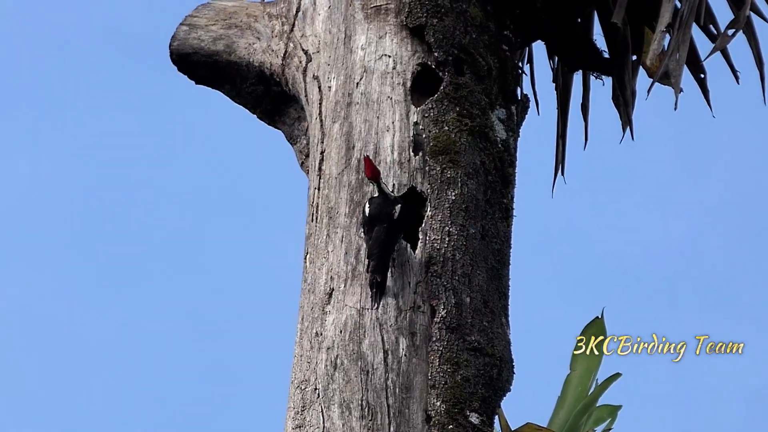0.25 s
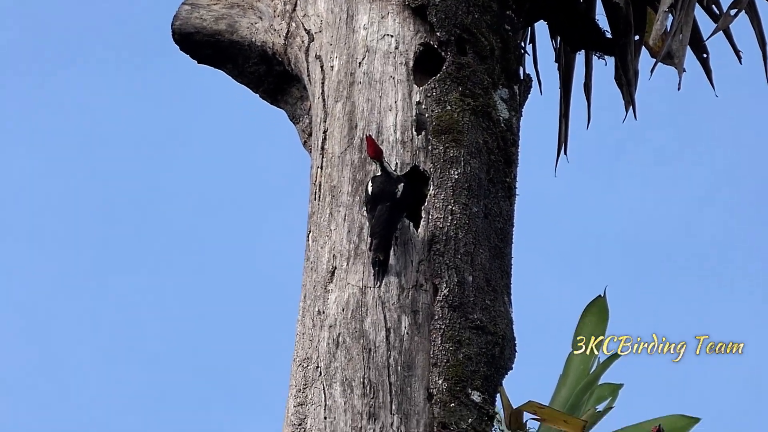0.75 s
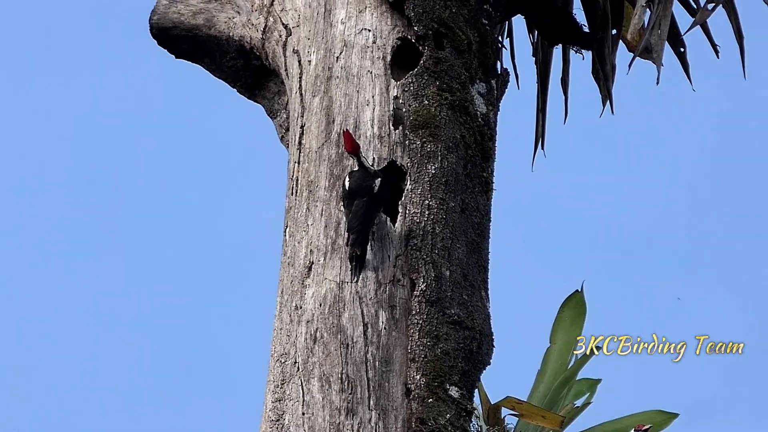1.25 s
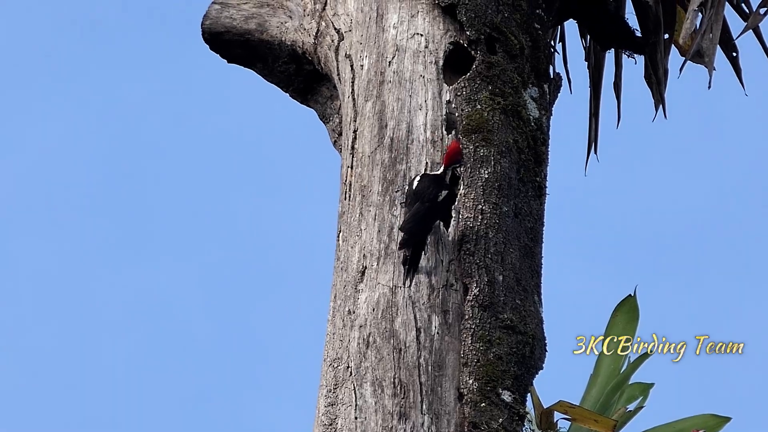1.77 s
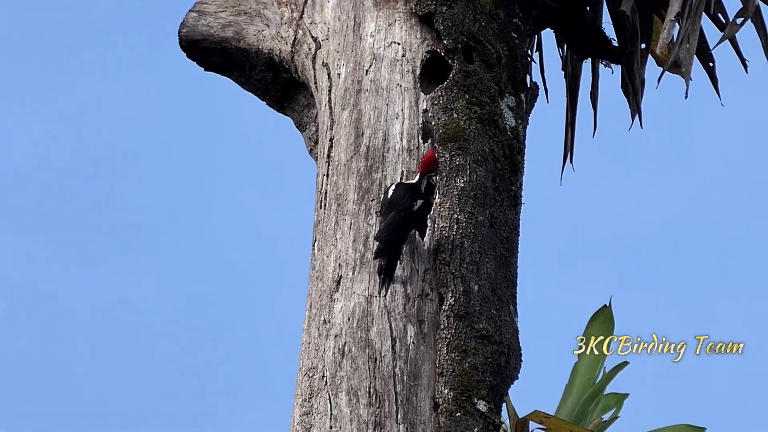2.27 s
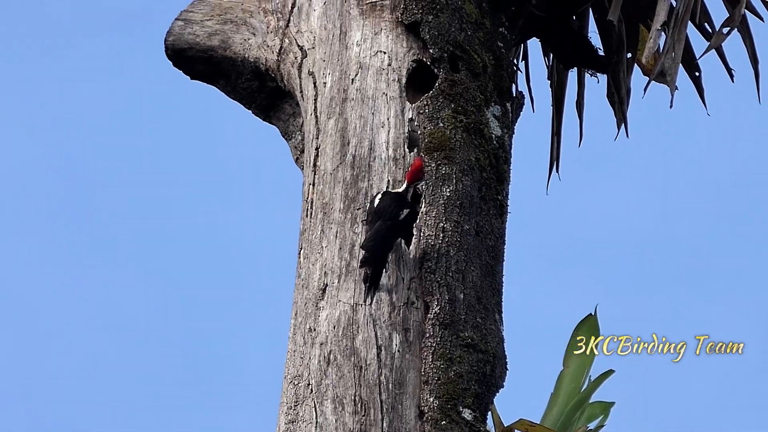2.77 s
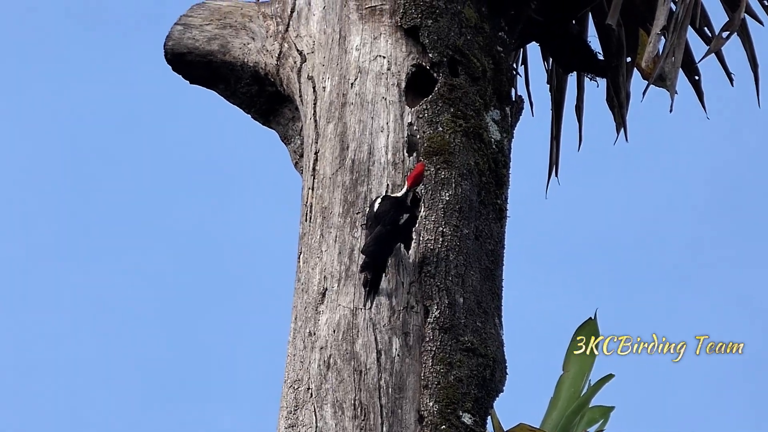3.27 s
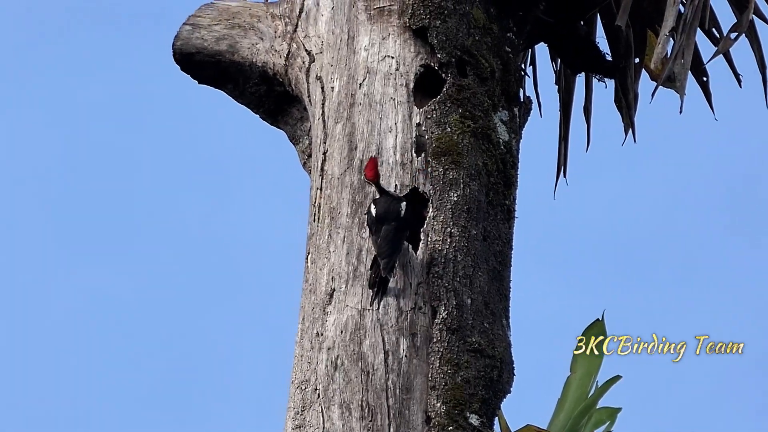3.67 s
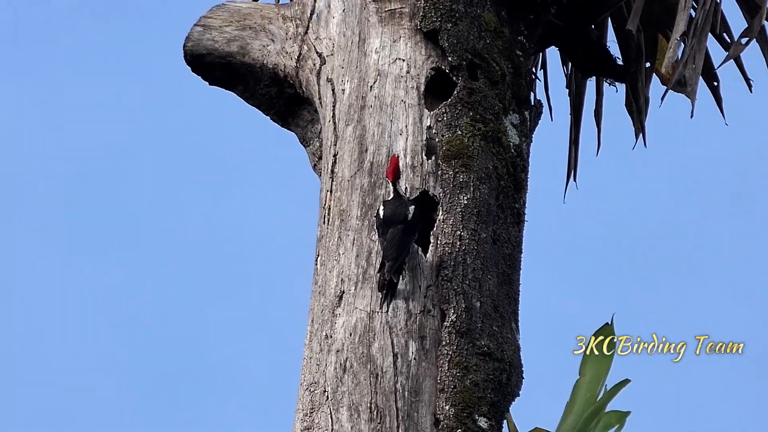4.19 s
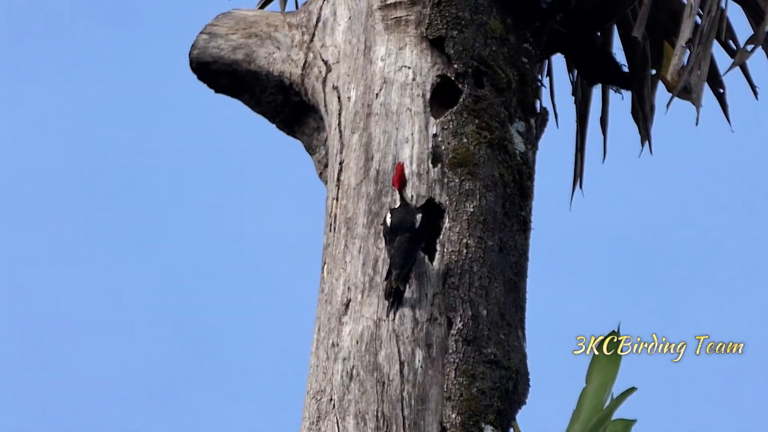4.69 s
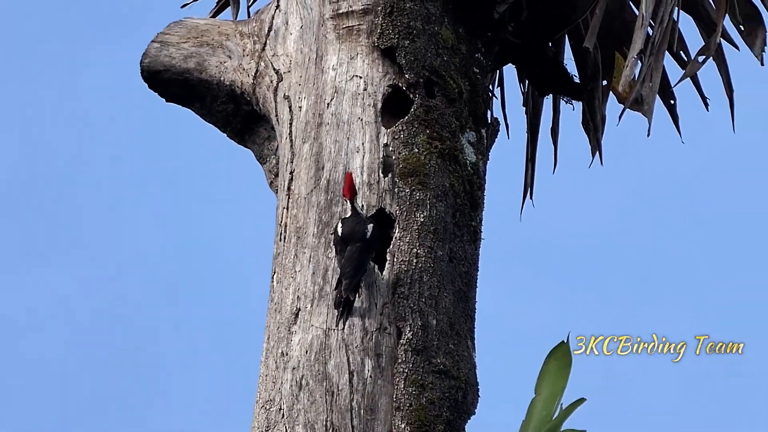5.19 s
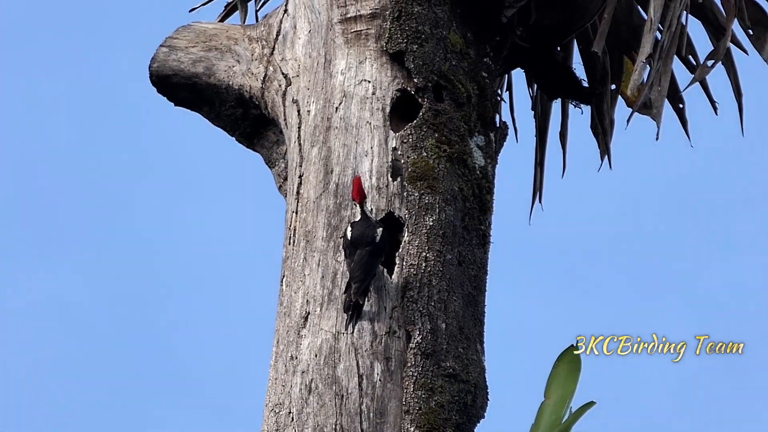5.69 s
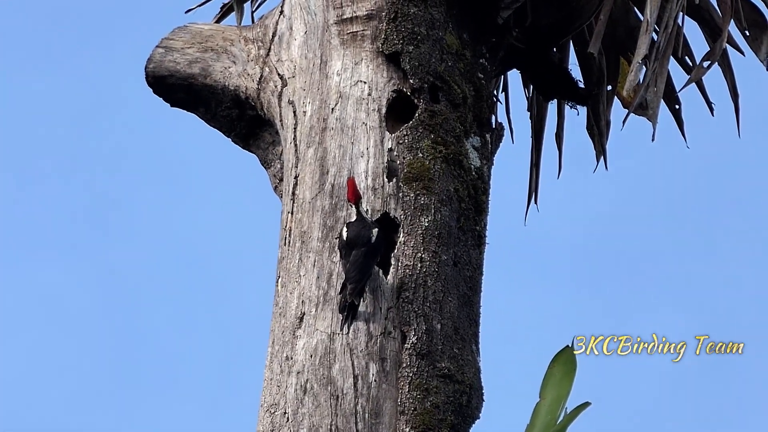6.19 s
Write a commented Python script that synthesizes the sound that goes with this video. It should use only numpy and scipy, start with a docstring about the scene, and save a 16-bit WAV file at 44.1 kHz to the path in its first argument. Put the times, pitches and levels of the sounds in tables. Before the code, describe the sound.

A quiet forest edge with faint hiss, heard in stereo; a woodpecker calls slightly right of centre, its voice scattering off trees. At 0 s comes a very short raspy churr. From about 0.7 to 1.5 s it gives four rapid harsh calls, each a thin high whistle snapping into a held nasal note, then a louder, rough falling yelp; some linger nasally. A soft claw scuff sounds near 1.75 s. Single calls follow at 2.3 and 2.7 s. Between 3.5 and 4.4 s there are five short rattles, buzzy rasps tipping into fluttering churrs, the last very faint. Two close yelping calls come at 4.7-5.0 s and two more at 5.1-5.45 s. Echoes fade while a distant rush, swelling since 3.5 s, peaks around 5.7 s. Dry bark ticks at 5.9 and 6.3 s frame thin, faint bird whistles; a low far drone rises at the end.

```python
"""Forest edge, a woodpecker on a dead trunk a little right of the microphone, giving bursts of harsh calls.
Each call is a thin sine whistle, a held nasal note of syrinx harmonics, then a loud falling yelp.
Between them it rattles: pulses ringing the throat (a rasp) tip over into a fluttering churr.
The trees return echoes and scatter; behind is shaped noise for forest hiss, a swelling far rush and drone,
hums and puffs of air. A small far bird whistles, claws scuff, and the bark ticks twice."""
import sys
import numpy as np
from scipy import signal
from scipy.fft import rfft, irfft
from scipy.io import wavfile

SR = 44100
rng = np.random.default_rng(int(sys.argv[2]) if len(sys.argv) > 2 else 0)


def master(y):
    """Save y as 16-bit WAV."""
    cut = np.clip(np.atleast_2d(y).T, -1, 1)
    pcm = np.round(cut * 32767)  # scale
    wavfile.write(sys.argv[1], SR, pcm.astype(np.int16))


N = 284445
TIME = np.arange(N) / SR


def from_db(db):
    """Decibels to amplitude gain."""
    return 10 ** (np.asarray(db) / 20)


def rms_one(x):
    """Scale to unit power."""
    return x / np.sqrt(np.mean(x ** 2) + 1e-20)


def at_hz(points, hz):
    """Read a table on a log-frequency axis."""
    table_hz, value = np.transpose(points)
    return np.interp(np.log(np.maximum(hz, 1)), np.log(table_hz), value)


def level(rows):
    """Gain over time from rows of start_s, level_db."""
    return from_db(np.interp(TIME, *np.transpose(rows)))


def band(x, low_hz, high_hz, order=2):
    """Butterworth band-pass."""
    edges = [low_hz, min(high_hz, .49 * SR)]
    return signal.sosfilt(signal.butter(order, edges, "band", fs=SR, output="sos"), x)


def resonate(x, modes):
    """Parallel two-pole resonances with alternating signs; a wider one rings for less time."""
    out = 0
    for k, (hz, width, db) in enumerate(modes):
        r = np.exp(-np.pi * width / SR)
        zeros = [(1 - r * r) / 2, 0, (r * r - 1) / 2]
        poles = [1, -2 * r * np.cos(2 * np.pi * hz / SR), r * r]
        out = out + (-1) ** k * from_db(db) * signal.lfilter(zeros, poles, x)
    return out


def wobble(t, rate_hz):
    """Random wander about zero: normal draws at the given rate, joined by straight lines."""
    return np.interp(t * rate_hz, np.arange(2048), rng.standard_normal(2048))


def clock(length):
    """Time since the start of a note."""
    return np.arange(int(length * SR)) / SR


def swell(t, attack, release):
    """Rounded rise and fall of a note."""
    rise = np.sin(np.pi / 2 * np.clip(t / attack, 0, 1))
    fall = np.sin(np.pi / 2 * np.clip((t[-1] - t) / release, 0, 1))
    return rise * fall


def sine(pitch):
    """Unit-power tone following a pitch in Hz."""
    return np.sqrt(2) * np.sin(2 * np.pi * np.cumsum(pitch) / SR)


def add(out, s, sound):
    """Mix a sound in at a time."""
    at = max(round(s * SR), 0)
    out[at:at + len(sound)] += sound[:N - at]


def pan(db):
    """Channel gains for a left-minus-right level."""
    return from_db(np.array([[1], [-1]]) * db / 2)


def stereo(mid, side, alike):
    """Left and right spectra from two independent ones, with a given correlation."""
    return np.sqrt(1 + alike) * mid + np.sqrt(1 - alike) * side * [[1], [-1]]


# how alike the background is at left and right: pitch_hz, correlation [-1 to 1]
BACKGROUND_LIKENESS = [(60, .1), (250, 0.15), (700, 0.2), (2000, 0.22), (5000, 0.76), (13000, 0.22)]
# which side the background leans to: pitch_hz, left_minus_right_db
BACKGROUND_BALANCE = [(60, 16), (150, 6), (600, 7), (1200, 0), (3000, -1), (12000, 1)]


def noise(spectrum):
    """Steady stereo noise of a given colour, unit power in the mean of the channels."""
    hz = np.fft.rfftfreq(N, 1 / SR)
    alike = np.clip(at_hz(BACKGROUND_LIKENESS, hz), -1, 1)
    mid, side = rfft(rng.standard_normal((2, N)))
    both = stereo(mid, side, alike) * pan(at_hz(BACKGROUND_BALANCE, hz))
    out = irfft(both * from_db(at_hz(spectrum, hz)), N)
    return out / out.mean(axis=0).std()


# colour of the still forest: pitch_hz, level_db [per Hz]
FOREST_COLOUR = [(100, -40), (200, -29.5), (330, -17.5), (480, -19), (700, -10.5), (1100, -5), (1600, 6.5),
                 (2100, 0), (2800, -1), (4000, -2), (4800, -13), (6200, -3), (8200, -17), (10000, -12),
                 (15000, -23)]
FOREST_DB = -55
# colour of the far rush: pitch_hz, level_db [per Hz]
RUSH_COLOUR = [(120, -29), (290, -39), (390, -28), (500, -18), (750, -0.5), (1100, 3), (1600, 2.5),
               (2300, -7), (4000, -8), (6000, -19), (10000, -26)]
# swelling of the far rush: start_s, level_db
RUSH_SWELL = [(0, -64), (3.3, -65), (3.8, -58), (4.6, -56), (5.2, -52.5), (5.7, -52), (6.1, -53),
              (6.45, -56)]


def forest_and_rush():
    """Forest hiss and a far rush; moving air fades the far sound in and out, band by band."""
    steady = from_db(FOREST_DB) * noise(FOREST_COLOUR) + level(RUSH_SWELL) * noise(RUSH_COLOUR)
    fading = 0
    for hz in (504, 670, 910, 1250):
        fading = fading + band(steady, hz / 1.18, hz * 1.18, order=1) * .27 * wobble(TIME, 11)
    return steady + fading


# swelling of the far low drone: start_s, level_db
DRONE_SWELL = [(0, -105), (5.4, -100), (5.9, -80), (6.15, -77), (6.3, -64.5), (6.45, -57.5)]


def far_drone():
    """A far low drone: noise with humps near 140 and 290 Hz."""
    # pitch_hz, level_db [per Hz]
    colour = [(30, -32), (90, 1), (140, 13.0), (200, -1), (290, 10.5), (450, -10), (900, -43)]
    return level(DRONE_SWELL) * noise(colour)


# faint far hums: centre_s, pitch_hz, level_db
FAR_HUMS = [(.9, 343, -77), (2.13, 668, -73.5), (2.98, 330.7, -76.5), (3.64, 685, -68.5), (4.236, 605, -67),
            (4.62, 254, -75.5)]
HUM_HALF_S = .16   # half the length of a hum


def far_hums(white):
    """Narrow bands of noise, each under a flat-topped swell."""
    out = 0
    for s, hz, db in FAR_HUMS:
        shape = np.exp(-((TIME - s) / HUM_HALF_S) ** 4)
        out = out + from_db(db) * shape * rms_one(band(white, hz - 25, hz + 25))
    return out


# puffs of air on the microphone: centre_s, half_width_s, level_db
AIR_PUFFS = [(0.242, 0.064, -65), (.71, 0.078, -80), (1.22, 0.1, -83), (2.44, 0.04, -72),
             (2.58, 0.081, -77), (2.92, 0.052, -77), (4.86, 0.021, -75)]
AIR_FLOOR_DB, AIR_SWING_DB = -107, 7   # faint stirring of the air, also between the puffs


def air_on_microphone(white):
    """Low noise in light puffs over a faint random stirring, stronger on the right."""
    gusts = sum(from_db(db) * np.exp(-((TIME - s) / width) ** 4) for s, width, db in AIR_PUFFS)
    stirring = from_db(AIR_FLOOR_DB + AIR_SWING_DB * wobble(TIME, 12))
    return (gusts + stirring) * rms_one(band(white, 25, 130)) * pan(-6)


def background():
    """Everything behind the birds; hums and puffs are filtered from the same noise."""
    white = rng.standard_normal((2, N))
    return forest_and_rush() + far_drone() + far_hums(white[0]) + air_on_microphone(white)


# small far bird, thin arched whistles: start_s, length_s, pitch_hz [before arch and wander], level_db
SMALL_BIRD_WHISTLES = [(5.98, .175, 5790, -62), (6.22, .19, 5900, -62), (6.05, .12, 6850, -72),
                       (6.25, .15, 7150, -70)]


def small_bird(arch=0.0186):
    """Thin sine whistles that swell softly and arch a little in pitch."""
    out = np.zeros(N)
    for s, length, hz, db in SMALL_BIRD_WHISTLES:
        t = clock(length)
        pitch = hz * (1 + arch * (np.sin(2.3 * t / length) - .8) + 0.006 * wobble(t, 192))
        add(out, s, from_db(db) * swell(t, 0.018, 0.01) * sine(pitch))
    return out


# dry ticks on the bark: start_s, peak_db
BARK_TICKS = [(5.891, -32), (6.336, -36)]
# resonances of the bark under a tick: pitch_hz, width_hz, level_db
BARK_MODES = [(818, 110, 2), (2140, 350, -2), (3100, 500, -8.5)]
SCUFF_S, SCUFF_WIDTH_S, SCUFF_DB = 1.748, .022, -54   # claws shift on the bark


def bark():
    """A scuff of claws as a hump of noise, and short bursts of noise that ring the bark as ticks."""
    scrape = rms_one(signal.lfilter([1], [1, -.7], band(rng.standard_normal(N), 1900, 11000)))
    out = from_db(SCUFF_DB) * np.exp(-((TIME - SCUFF_S) / SCUFF_WIDTH_S) ** 2 / 2) * scrape
    t = clock(.03)
    for s, db in BARK_TICKS:
        crunch = rng.standard_normal(len(t)) * np.exp(-((t - .003) / 0.0032) ** 2)
        tick = band(resonate(crunch, BARK_MODES), 800, 5000)
        add(out, s, from_db(db) * tick / np.abs(tick).max())
    return out


# decay of the forest tail: pitch_hz, t60_s
FOREST_DECAY = [(900, 0.84), (1500, 0.56), (2200, 0.93), (4000, 1), (7000, 0.98), (14000, 0.16)]


def scatter(near_db=-4, near_t60=0.45, far_db=-7, build_up=0.028, alike=0.75):
    """Stereo response of the trees: quick scatter from near branches and a long tail from the forest."""
    t, edges = clock(1), [500, 1200, 1800, 3000, 5000, 9000, 16000]
    mid, side = rfft(rng.standard_normal((2, len(t))))
    hz = np.fft.rfftfreq(len(t), 1 / SR)
    both = stereo(mid, side, alike)
    onset = 1 - np.exp(-t / build_up)
    response = 0
    for low, high in zip(edges, edges[1:]):
        far_t60 = at_hz(FOREST_DECAY, np.sqrt(low * high))
        near = from_db(near_db) * rms_one(onset * from_db(-60 * t / near_t60))
        far = from_db(far_db) * rms_one(onset * from_db(-60 * t / far_t60))
        in_band = (hz >= low) & (hz < high)
        response = response + irfft(both * in_band, len(t)) * np.hypot(near, far)
    return response / np.sqrt(2 * len(t))


# echoes off trunk, ground and near trees: delay_s, level_db, left_minus_right_db
TREE_ECHOES = [(.0093, -12.5, 18.5), (0.019, -15.5, -17.5), (0.033, -9.5, -3.5), (.052, -11.5, 12)]


def trees(x):
    """Distinct echoes plus scatter, drawn afresh every third of a second and crossfaded,
    so no one random pattern of reflections lasts."""
    out = x
    for delay, db, side_db in TREE_ECHOES:
        out = out + from_db(db) * pan(side_db) * np.interp(TIME - delay, TIME, x, left=0)
    hop = SR // 3
    for centre in range(0, N + hop, hop):
        at = np.arange(max(centre - hop, 0), min(centre + hop, N))
        piece = x[at] * np.cos(np.pi / 2 * (at - centre) / hop)   # crossfades with its neighbours
        for channel, wet in zip(out, signal.fftconvolve(piece[None], scatter(), axes=1)):
            add(channel, at[0] / SR, wet)
    return out


# response of the woodpecker's throat: pitch_hz, level_db
THROAT_RESPONSE = [(1400, -7), (2000, -2), (3000, 3), (4200, -0.5), (5300, -8.5), (6200, -4.5), (7200, -17),
                   (8200, -13.5), (10200, -27.5), (12200, -35), (14200, -26.5), (16000, -65)]


def syrinx(t, hz, second_db, upper_db, jitter, shimmer, slope_db, hiss_db):
    """Harmonics of an unsteady membrane, with air noise released each cycle, shaped by the throat."""
    phase = 2 * np.pi * np.cumsum(hz * (1 + jitter * wobble(t, 872.6))) / SR
    tone = 0
    for k in range(1, 10):
        if k == 1:
            db = 0
        elif k == 2:
            db = second_db
        else:
            db = upper_db + slope_db * np.log2(k / 3)
        audible = k * hz < SR / 2
        tone = tone + from_db(db + at_hz(THROAT_RESPONSE, k * hz)) * audible * np.sin(k * phase)
    breath = rng.standard_normal(len(t)) * (1 + np.cos(phase))
    throat = from_db(at_hz(THROAT_RESPONSE, np.fft.rfftfreq(len(t), 1 / SR)))
    air = rms_one(band(irfft(rfft(breath) * throat, len(t)), 2150, 23000, order=3))
    return np.sqrt(2) * tone * (1 + shimmer * wobble(t, 700)) + from_db(hiss_db + upper_db) * air


# throat resonances rung by a rasp: pitch_hz, width_hz, level_db
RASP_RESONANCES = [(1690, 373, 10), (2410, 380, 7), (3700, 2300, 2.5), (4940, 1520, -2), (7600, 830, -42)]
RASP_RISE, RASP_RELEASE_S = .06, 0.046   # rise of the pulse rate as a share of it


def rasp(length, rate, db, hiss=0.064, attack_share=0.28):
    """Slow pulses of the syrinx, by turns strong and weak, ring the throat."""
    t = clock(length)
    unsteady = 1 + .014 * wobble(t, 500)
    cycles = np.cumsum(rate * (1 + RASP_RISE * (t / length - .5)) * unsteady) / SR
    strength = from_db(2 * np.cos(np.pi * cycles) + 2.2 * wobble(t, 600))
    pulses = np.diff(np.floor(cycles), prepend=0) * strength   # one for each whole cycle passed
    buzz = band(resonate(pulses + hiss * wobble(t, SR / 4), RASP_RESONANCES), 1440, 8000)
    return from_db(db) * swell(t, attack_share * length, RASP_RELEASE_S) * rms_one(buzz)


CHURR_RISE = 0.0377   # rise in pitch as a share of it
FLUTTER_DEPTH = .6   # swing of a churr's amplitude about its middle, as a share of it


def churr(length, hz, db, upper_db, flutter_hz=55, bend=0.0294):
    """Each flutter is a short, uneven arch in both pitch and loudness."""
    t = clock(length)
    flutter = -np.cos(2 * np.pi * flutter_hz * t + 0.36 * wobble(t, 53.5))
    waver = 1 + .022 * wobble(t, 140)
    pitch = hz * (1 + CHURR_RISE * (t / length - .5)) * (1 + bend * (flutter - .5)) * waver
    tone = syrinx(t, pitch, upper_db, upper_db - 7.0, jitter=0.02, shimmer=0.36, slope_db=8.0, hiss_db=-14)
    return from_db(db) * swell(t, 0.0013, 0.025) * (1 + FLUTTER_DEPTH * flutter) * tone


# rattles, a rasp tipping over into a churr; levels before throat, flutter and trees:
# start_s, rasp_s [before overlap], pulse_rate [per s], rasp_db,
# churr_s, churr_hz [before rise and flutter], churr_db, overtones_db [second harmonic]
RATTLE_CALLS = [(0, .02, 520, -30.5, 0.0758, 1904, -30, -10),
                (3.544, 0.084, 570, -43, 0.08, 1998, -37.5, -2),
                (3.693, .119, 572, -33.5, .055, 1987, -34, -4.5),
                (3.883, .086, 575, -38, 0.12, 2103, -37, -2),
                (4.084, 0.07, 612, -30.5, 0.0999, 2029, -34, -4),
                (4.275, .02, 600, -52, 0.0924, 2008, -45, -13)]
RASP_OVERLAP_S = .02   # the rasp dies away under the start of the churr


def rattles():
    """Each rasp, the slow buzz of the syrinx, runs straight into its churr."""
    out = np.zeros(N)
    for s, rasp_s, rate, rasp_db, churr_s, churr_hz, churr_db, upper_db in RATTLE_CALLS:
        add(out, s, rasp(rasp_s + RASP_OVERLAP_S, rate, rasp_db))
        add(out, s + rasp_s, churr(churr_s, churr_hz, churr_db, upper_db))
    return out


WHISTLE_START_HZ = 3900   # every whistle sets out from about this pitch


def whistle(length, end_hz, db, jitter=0.0032, attack_share=0.39):
    """A nearly pure tone that swells and eases towards its end pitch."""
    t = clock(length)
    glide = WHISTLE_START_HZ + (end_hz - WHISTLE_START_HZ) * np.sin(np.pi / 2 * t / length)
    pitch = glide * (1 + jitter * wobble(t, 420))
    return from_db(db) * swell(t, attack_share * length, 0.0033) * sine(pitch)


def nasal(length, hz, db, fade_db, second_db, upper_db, snap_s=.003, thin_db=16, sag=0.038, quaver_db=2):
    """The pitch snaps down about an octave, quavers, then sags; overtones come in as it settles."""
    t = clock(length)
    tension = np.exp(-t / snap_s)
    waver = 1 + .012 * wobble(t, 130)
    pitch = hz * (1.005 + 1.2 * tension - sag * (t / length) ** 5) * waver
    tone = syrinx(t, pitch, second_db - thin_db * np.sqrt(tension), upper_db - thin_db * tension,
                  jitter=0.014, shimmer=0.14, slope_db=-12.5, hiss_db=-0.5)
    loudness_db = db + fade_db * (.5 - t / length) + quaver_db * wobble(t, 121)
    return from_db(loudness_db) * swell(t, 0.0095, 0.022) * tone


YELP_RATTLE = .22   # depth of the rattle at the bottom of a yelp, share of amplitude
YELP_ATTACK_S, YELP_UPPER_DB = 0.0074, -10


def yelp(length, fall, start_hz, end_hz, db, lift=0.079, lift_s=0.0088, rattle_hz=340):
    """From a high start the pitch slides down and lifts at the end; the voice richens and rattles."""
    t = clock(length)
    tension = np.maximum(1 - t / fall, 0) ** 2
    pitch = (end_hz + (start_hz - end_hz) * tension) * (1 + lift * np.exp((t - length) / lift_s))
    waver = 1 + .024 * wobble(t, 260)
    rich_db = YELP_UPPER_DB - 9 * tension
    tone = syrinx(t, pitch * waver, rich_db + 4.5, rich_db - 0.5,
                  jitter=0.024, shimmer=0.26, slope_db=-2.5, hiss_db=3)
    throb = 1 + YELP_RATTLE * (1 - tension) * np.sin(2 * np.pi * rattle_hz * t + wobble(t, 140))
    return from_db(db) * swell(t, YELP_ATTACK_S, 0.027) * throb * tone


# calls, a whistle breaking to a nasal note that leaps into a yelp; levels before throat and trees:
# break_s, whistle_s [before slur], whistle_end_hz, whistle_db,
# hold_s [before slur], note_hz [before snap and sag], note_db, second_harmonic_db, upper_harmonics_db,
# yelp_s, fall_s, yelp_end_hz [before the last lift], yelp_db, linger_s
CRY_CALLS = [(0.73, 0.025, 3640, -41.5,   0.046, 1563, -34, -6, -11,   0.043, 0.015, 1850, -27,   0.108),
             (0.944, 0.043, 4140, -36,   0.067, 1663, -31, -3, -5.5,   0.05, 0.035, 1830, -25,   0),
             (1.103, 0.026, 3960, -31,   0.06, 1678, -37, 3.5, -0.5,   .04, 0.0318, 3044, -35.5,   0.09),
             (1.335, 0.047, 4140, -41.5,   0.056, 1692, -29, -7.5, -8,   0.062, .04, 2027, -24,   0),
             (2.281, 0.064, 4296, -47.5,   0.057, 1427, -32.5, -4.5, -8,   0.063, 0.068, 1840, -28.5,   0),
             (2.671, 0.057, 4190, -42,   0.061, 1660, -29, -3.5, -7,   0.069, 0.055, 1980, -25,   0.012),
             (4.682, 0.035, 3866, -39.5,   0.073, 1695, -34.5, 2, -13,   .04, .012, 1955, -30,   0.041),
             (4.835, .027, 4070, -35,   .063, 1579, -30, -2, -7.5,   0.064, 0.051, 1987, -24,   0),
             (5.113, 0.046, 3935, -32,   0.063, 1733, -36.5, 7.5, -6,   0.076, 0.034, 2085, -30,   0),
             (5.304, 0.034, 4100, -42,   .056, 1646, -29.5, -1, -2,   0.072, 0.041, 2023, -23.5,   0)]
YELP_LEAP = 2.1   # a yelp starts from about this multiple of the note
SLUR_S = 0.0044   # whistle and held note each reach this far into the next part
NOTE_FADE_DB, LINGER_FADE_DB = 2, 7   # how much a note weakens while held, and while it lingers
# the lingering note grows out of the end of the yelp; level relative to it
LINGER_HZ, LINGER_DB, LINGER_OVERLAP_S = 1658, -6.5, .016


def cries():
    """Whistle, nasal note and yelp are slurred together; sometimes the voice drops back onto a note."""
    out = np.zeros(N)
    for (s, whistle_s, whistle_hz, whistle_db, hold, note_hz, note_db, second_db, upper_db,
         yelp_s, fall, yelp_hz, yelp_db, linger) in CRY_CALLS:
        add(out, s - whistle_s, whistle(whistle_s + SLUR_S, whistle_hz, whistle_db))
        add(out, s, nasal(hold + SLUR_S, note_hz, note_db, NOTE_FADE_DB, second_db, upper_db))
        add(out, s + hold, yelp(yelp_s, fall, YELP_LEAP * note_hz, yelp_hz, yelp_db))
        if linger > LINGER_OVERLAP_S:
            after = nasal(linger, LINGER_HZ, yelp_db + LINGER_DB, LINGER_FADE_DB, second_db, upper_db)
            add(out, s + hold + yelp_s - LINGER_OVERLAP_S, after)
    return out


def scene():
    """Both birds sound among the trees, a little to the right; the bark is dry and central."""
    birds = trees(cries() + rattles() + small_bird())
    return from_db(-2.5) * birds * pan(-1.7) + bark() + background()


# resonances and notches of the microphone housing: pitch_hz, width_hz, level_db
HOUSING_PEAKS = [(509, 42, 16.5), (648, 55, 8.5), (795.7, 27.6, 12), (997, 15, 4.5), (1195.5, 29, 9),
                 (1660, 30, 5), (1843, 100, -6.5), (1850, 83, 7.5), (2097, 86, 9), (2137, 58, -7.5),
                 (2400.5, 270, 2), (2673, 140, -10.5), (3108, 260, 1), (3630, 415, -2.5), (4050, 350, 4),
                 (5040, 60, 6.5)]


def housing(x):
    """The microphone housing as a chain of peaks and notches."""
    for hz, width, db in HOUSING_PEAKS:
        gain, half, cos = from_db(db / 2), np.pi * width / SR, np.cos(2 * np.pi * hz / SR)
        zeros = [1 + half * gain, -2 * cos, 1 - half * gain]
        poles = [1 + half / gain, -2 * cos, 1 - half / gain]
        x = signal.lfilter(zeros, poles, x)
    return x


CUTOFF_HZ = 15200


def record(dry):
    """The housing colours the sound; an elliptic low-pass cuts the top steeply."""
    low_pass = signal.ellip(10, .2, 90, CUTOFF_HZ, fs=SR, output="sos")
    return signal.sosfilt(low_pass, housing(dry))


dry = scene()
out = record(dry)
master(out)
```